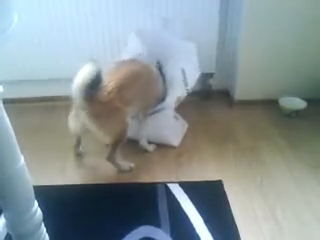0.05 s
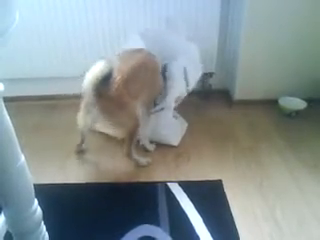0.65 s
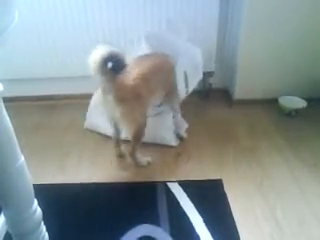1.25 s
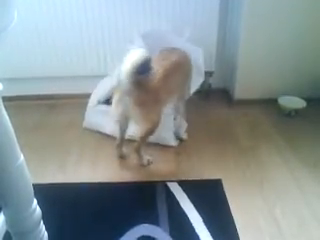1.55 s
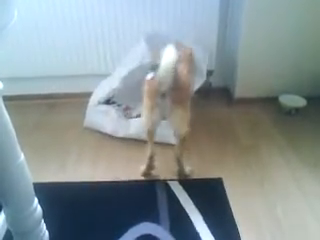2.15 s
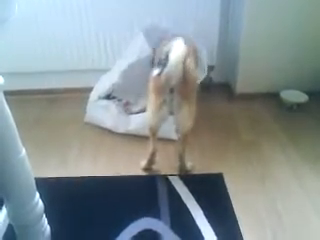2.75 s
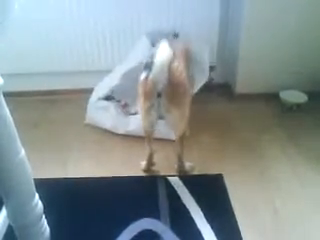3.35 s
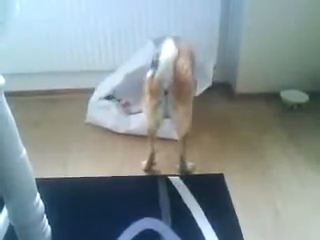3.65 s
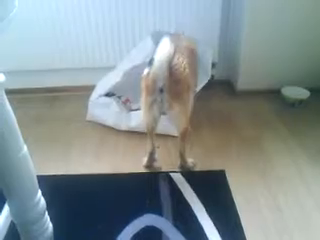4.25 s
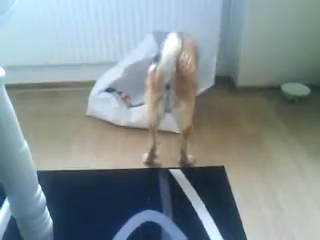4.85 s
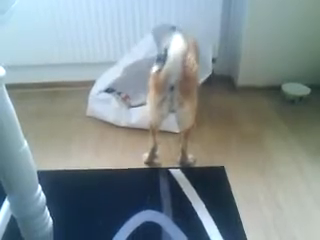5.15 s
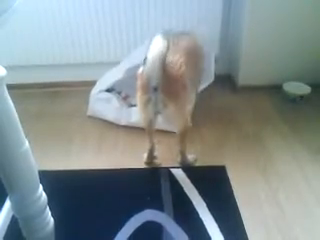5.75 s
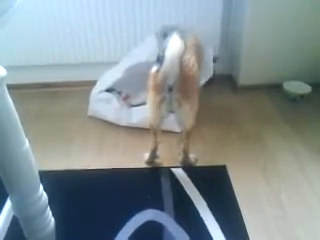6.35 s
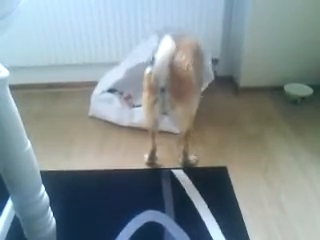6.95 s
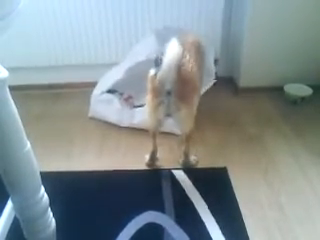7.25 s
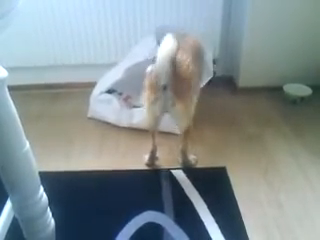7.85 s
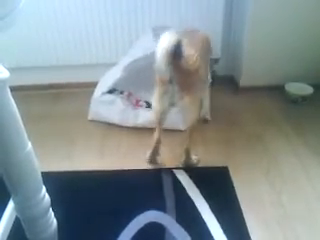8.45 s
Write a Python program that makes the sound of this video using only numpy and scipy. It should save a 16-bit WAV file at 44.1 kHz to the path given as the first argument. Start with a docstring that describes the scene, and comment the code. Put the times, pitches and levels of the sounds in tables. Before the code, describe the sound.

A dog roots around in a big paper bag, making loud, uneven crumpling and rustling with sharp crackles in a small room.

```python
"""A dog roots with its head in a big paper bag on a wooden floor.
Each shove crumples the paper in a swarm of tiny buckles. Creases snap, whole panels flop,
and muzzle and paws bump the hollow bag. A small bare room rings after every shove.
It is all heard over a faint steady hush, a few steps away, by a microphone that loses the top treble."""
import sys
import numpy as np
from scipy import signal
from scipy.fft import rfft, irfft, next_fast_len
from scipy.io import wavfile
from scipy.ndimage import uniform_filter1d

SR = 44100
rng = np.random.default_rng(int(sys.argv[2]) if len(sys.argv) > 2 else 0)


def int16_out(signal):
    """Quantize to a 16-bit WAV file."""
    q = np.round(np.clip(np.atleast_2d(signal).T, -1, 1) * 32767)
    wavfile.write(sys.argv[1], SR, q.astype(np.int16))


N = 379680


def amp(db):
    """Turn decibels into a number to multiply by."""
    return 10 ** (np.asarray(db) / 20)


def unit(x):
    """Scale a sound to an average (rms) level of 1."""
    return x / np.sqrt(np.mean(x ** 2) + 1e-20)


def along(points, hz):
    """Read a curve between its (Hz, value) points, with octaves evenly spaced."""
    freqs, values = np.transpose(points)
    return np.interp(np.log(hz + 1), np.log(freqs + 1), values)


def coloured(x, gain):
    """Turn each frequency up or down by gain(hz)."""
    size = 2 * next_fast_len(len(x) // 2 + 4096)
    hz = np.fft.rfftfreq(size, 1 / SR)
    cepstrum = irfft(np.log(np.maximum(gain(hz), 1e-6)))
    # make the filter ring only after a sound, never before it
    cepstrum[1:size // 2] *= 2
    cepstrum[size // 2 + 1:] = 0
    return irfft(rfft(x, size) * np.exp(rfft(cepstrum)), size)[:len(x)]


def below(hz, edge_hz, order):
    """A soft step from 1 under the edge to 0 above it; a higher order is steeper."""
    return 1 / (1 + (hz / edge_hz) ** order)


def fade(t, seconds):
    """Die away by 60 dB in the given time."""
    return np.exp(-np.log(1000) * t / seconds)


def add(track, start_s, sound):
    """Mix a sound into the track."""
    part = track[max(round(start_s * SR), 0):][:len(sound)]
    part += sound[:len(part)]


def shove_force(peak_s, swell_s, ease_s):
    """The dog's push swells like a bell curve up to 1, then lets go."""
    t = np.arange(N) / SR - peak_s
    near = (t > -4 * swell_s) & (t < 6 * ease_s)
    force, t = np.zeros(N), t[near]
    force[near] = np.exp(-np.where(t < 0, np.abs(t / swell_s) ** 1.68, np.abs(t / ease_s) ** 1.31))
    return force


def buckles(per_second=480, spread_db=4.5, ring_s=0.011, colour_db=3.5, ripples_per_octave=0.7, count=48):
    """Small patches of paper buckle at random moments, each clicking with a tone of its own."""
    t = np.arange(SR // 100) / SR
    octaves = np.log2(np.fft.rfftfreq(len(t), 1 / SR) + 100)
    tint = amp(colour_db * np.cos(2 * np.pi * (ripples_per_octave * octaves + rng.random((count, 1)))))
    clicks = irfft(rfft(rng.standard_normal((count, len(t)))) * tint, len(t)) * fade(t, ring_s)
    clicks /= np.linalg.norm(clicks, axis=1, keepdims=True)
    dice = np.random.default_rng(rng.integers(1 << 30))
    when, size, which = dice.random((int(per_second * N / SR), 3)).T
    strength = amp(spread_db * np.minimum(-np.log(1 - size), 3))  # many weak, a few strong
    sounds = strength[:, None] * clicks[(which * count).astype(int)]
    places = (when * N).astype(int)[:, None] + np.arange(len(t))
    return np.bincount(places.ravel(), sounds.ravel(), N)[:N]


# The tone of crumpling paper. Each row: frequency in Hz, level in dB.
PAPER_TONE = [(30, -25.5), (60, -18.5), (95, -13), (135, -4.5), (280, -6), (450, -3.5), (650, 1), (1000, 3),
              (1250, -3.5), (1700, 0), (3200, -8.5), (4200, -19.5), (7000, -25.5)]
# The dog's shoves. Each row: moment of the peak, swell time and easing time, all in seconds,
# then level in dB, extra panel flexing in dB, extra fine crinkle in dB.
SHOVES = [(0, 0.05, 0.038, -24.5, 2, 0.5), (0.218, 0.053, 0.14, -16.5, -0.0, -0.5),
          (0.573, 0.15, 0.087, -30.5, 1, 3.5), (0.807, 0.083, 0.19, -25.5, 1, -2),
          (1.024, 0.034, 0.13, -21.5, 2.5, -0.5), (1.33, 0.1, 0.03, -33, 0.5, 1.5),
          (1.387, 0.028, 0.027, -16.5, 3, 0.5), (1.475, 0.017, 0.05, -24, 0.5, 0.5),
          (1.68, 0.15, 0.18, -33.5, 6, 0), (1.901, 0.047, 0.047, -19.5, 2.5, 3.5),
          (2.344, 0.12, 0.03, -16.5, 1.5, -3), (2.503, 0.11, 0.071, -33, 2.5, -1),
          (3.121, 0.19, 0.045, -18.5, 1.5, 3.5), (3.323, 0.25, 0.039, -24, -3.5, 3.5),
          (3.714, 0.17, 0.165, -23, 1.5, -1), (3.91, 0.035, 0.021, -18.5, -4.5, 9),
          (4.284, 0.067, 0.13, -22.5, -1, 3), (4.53, 0.11, 0.033, -25.5, -0.5, 3.5),
          (4.95, 0.072, 0.12, -20.5, 0, 4.5), (5.132, 0.028, 0.071, -25, 2, 4.5),
          (5.28, 0.099, 0.036, -27.5, -1.5, 4), (5.404, 0.028, 0.073, -29.5, -4, 3.5),
          (5.571, 0.11, 0.078, -17.5, -0.5, 5), (5.751, 0.04, 0.061, -23.5, -3, 0),
          (6.163, 0.29, 0.09, -30, 3.5, 1.0), (6.368, 0.057, 0.024, -18.5, 1, 3),
          (6.845, 0.15, 0.16, -18.5, 0, 2.0), (7.017, 0.013, 0.14, -21.5, 1, -1.5),
          (7.535, 0.11, 0.067, -21, 0.0, -2), (7.778, 0.16, 0.08, -23.5, 0.5, 1.0),
          (8.215, 0.075, 0.037, -16.5, -0.5, 4.5), (8.312, 0.012, 0.088, -17, -0.5, 3.5)]
def crumpling(panel_top_hz=680, wrinkle_bottom_hz=3800):
    """One swarm of buckles shakes low panels, middle creases and high wrinkles as the dog shoves."""
    power, out = np.zeros((3, N)), np.zeros(N)
    for peak_s, swell_s, ease_s, db, flex_db, crinkle_db in SHOVES:
        force = shove_force(peak_s, swell_s, ease_s)
        power[0] += (amp(db - 10 + flex_db) * force ** 0.91) ** 2  # panels give early
        power[1] += (amp(db - 3) * force) ** 2  # creases follow the push
        power[2] += (amp(db - 11.5 + crinkle_db) * force ** 1.17) ** 2  # fine wrinkles need force

    def tone(hz, band):
        panels = below(hz, panel_top_hz, order=6)
        wrinkles = 1 - below(hz, wrinkle_bottom_hz, order=10)
        creases = np.clip(1 - panels - wrinkles, 0, 1)
        return amp(along(PAPER_TONE, hz)) * np.sqrt((panels, creases, wrinkles)[band])

    swarm = buckles()
    for band, level in enumerate(np.sqrt(power)):
        out += level * unit(coloured(swarm, lambda hz: tone(hz, band)))
    return out * dips_before_snaps()


# The tone of the still room. Each row: frequency in Hz, level in dB.
HUSH_TONE = [(25, -3.5), (60, -3), (130, -2), (300, -12), (1000, -17.5), (3000, -16.5), (7000, -28.5)]
def room_hush():
    """The still room makes a steady noise, strongest in the bass."""
    return unit(coloured(rng.standard_normal(N), lambda hz: amp(along(HUSH_TONE, hz))))


# The tone of a snapping crease. Each row: frequency in Hz, level in dB.
SNAP_TONE = [(60, -31), (200, -7), (500, -7), (1000, -1), (1600, -1), (2400, -0.5), (3200, 2), (4200, -7.5),
             (7000, -15)]
# Creases that snap. Each row: moment in seconds, strength in dB, extra treble in dB,
# level of the flurry compared with the crack in dB.
SNAPS = [(0.3436, -5.5, -11, -4.5), (0.439, -6, -5.5, -4.5), (0.5624, -6.5, -8, -6),
         (0.7505, 0.5, -5.5, -2.5), (0.7714, -8, 1, -8.5), (0.8927, 2, 1.5, -4), (1.0033, -10, -4.5, -3),
         (1.4606, -5.5, -0.5, -5.5), (1.711, -8.5, -1.5, -3.5), (1.7556, -4, -6.5, -4.5),
         (1.8541, -3, -2.5, -3.5), (1.9935, -7, -7, -5), (2.1672, -7, -7.5, -7.5), (2.196, 0.5, -7, -9.5),
         (2.2499, -9.5, -4, -2.5), (2.3494, 1, 2.5, -6.5), (2.4994, -6.5, -21, -9), (2.6601, 0.5, -10, -4),
         (2.767, -9.5, -13, -6), (3.23, -3.5, -4, -3.5), (3.313, 2, -10, -9.5), (3.5672, 2.5, -4.5, -11.5),
         (4.2498, 3, 0.5, -8.5), (4.2655, 0, 3, -10), (4.298, -10, -2, -12), (4.4307, -5.5, -17, -7),
         (4.5147, -7.5, 1, -3), (4.8198, -13.5, -4.5, -4), (5.0315, -4, -1.5, -5), (5.1335, -8, 0, -3.5),
         (5.475, -6.5, -11.5, -1.5), (5.4913, 1, 7, -8), (5.743, -9, -2, -1.5), (5.9652, -2, -9, -7),
         (5.9928, -6, 3, -10.5), (6.124, -8, -9.5, -3.5), (6.2765, -10.5, -4, 0), (6.3537, -4.5, -3.5, -2),
         (6.6162, -1.5, -20, -3.5), (6.7048, -2.5, -1, -2.5), (6.764, -3.5, -0.5, -6.5),
         (7.111, -7.5, -1.5, -2.5), (7.306, -2, -3, -9.5), (7.5152, 1, 0.5, -10), (8.108, 4, -5.5, -13),
         (8.1506, -1, -2.5, -2.5), (8.316, -2.5, 1, -4.5), (8.3694, -5, -4, 0)]
def crease_snaps(crack_s=0.011, flurry_s=0.068, run_s=0.00074, lead_s=0.003, grit_db=3.5):
    """A faint, very brief noise swells into one crack, followed by a flurry of crinkles."""
    t, out = np.arange(-SR // 50, SR // 6) / SR, np.zeros(N)
    after = np.maximum(t, 0)
    giving = 1 - np.exp(-after / run_s)  # the fold takes a moment to run along the sheet
    lead_in = amp(-15) * np.exp(-np.abs(t) / lead_s)
    for moment_s, db, treble_db, flurry_db in SNAPS:
        noise = rng.standard_normal(len(t))
        flicker = np.repeat(rng.uniform(-2, 2, len(t)), 48)[:len(t)]  # a new level every 48 samples
        grit = unit(noise * amp(grit_db * flicker))
        crack = rng.standard_normal(len(t)) * fade(after, crack_s)
        flurry = amp(flurry_db) * grit * fade(after, flurry_s)
        burst = giving * (crack + flurry) + lead_in * grit
        treble = [(1700, 0), (5000, treble_db)]  # a tight crease keeps more treble
        snap = coloured(burst, lambda hz: amp(along(SNAP_TONE, hz) + along(treble, hz)))
        add(out, moment_s + t[0], amp(db) * snap)
    return out


def dips_before_snaps(depth=0.17, lead_s=0.02):
    """Just before a crease gives way, the paper takes up the load and gets a little quieter."""
    t, gain = np.arange(N) / SR, np.ones(N)
    for moment_s, *_ in SNAPS:
        near = slice(max(round((moment_s - 4 * lead_s) * SR), 0), round(moment_s * SR))
        gain[near] *= 1 - depth * np.exp(-((moment_s - t[near]) / lead_s) ** 2)
    return gain


# Panels that flop or are pushed on the floor. Each row: start in seconds, level in dB, pitch in Hz.
FLOPS = [(0.354, -21, 246), (0.848, -25, 170), (1.081, -29.5, 176), (1.377, -26, 147), (1.869, -24, 137.5),
         (2.339, -15.5, 321), (3.061, -17, 121), (4.933, -22.5, 206), (5.29, -23, 283), (6.368, -20.5, 261),
         (7.79, -26, 265), (8.079, -27, 147), (8.136, -26, 300), (8.307, -29, 155)]
def panel_flops(ring_s=0.082, attack_s=0.0057):
    """A broad panel pushes air: a short, soft, low thud."""
    t, out = np.arange(SR // 4) / SR, np.zeros(N)
    shape = fade(t, ring_s) * (1 - np.exp(-t / attack_s))
    for start_s, db, hz in FLOPS:
        add(out, start_s, amp(db) * np.sin(2 * np.pi * hz * t) * shape)
    return out


# Muzzle and paws bump the hollow bag. Each row: start in seconds, level in dB, pitch in Hz.
BUMPS = [(1.007, -24, 495.0), (1.341, -24.5, 457.0), (1.616, -25.5, 870.0), (2.659, -27, 940.0),
         (3.589, -28, 635), (4.431, -24.5, 560), (5.286, -23.5, 970.0), (5.741, -21, 510.0),
         (5.965, -18, 1220.0), (6.276, -23, 520.0), (6.615, -21.5, 1000.0), (7.279, -30, 520.0),
         (8.078, -32.5, 530.0)]
def dog_bumps(ring_s=0.068, sharpness=2.5):
    """A soft touch sets a taut panel drumming briefly around one rough pitch."""
    t, out = np.arange(SR // 6) / SR, np.zeros(N)
    for start_s, db, pitch in BUMPS:
        panel = lambda hz: 1 / (1 + (sharpness * (hz / pitch - pitch / (hz + 1)) / 2) ** 2)
        drumming = unit(coloured(rng.standard_normal(len(t)), panel))
        add(out, start_s, amp(db) * drumming * fade(t, ring_s))
    return out


# How long the room rings. Each row: frequency in Hz, seconds to die away by 60 dB.
RING_TIMES = [(100, 0.52), (700, 0.41), (2000, 0.41), (6000, 0.38)]
def room_echo(x, echo_db=3, build_s=0.00095, spots=12, hold_samples=256):
    """From moment to moment another spot of the bag sounds, and the walls answer each differently."""
    sounding = np.repeat(rng.integers(spots, size=N // hold_samples + 1), hold_samples)[:N]
    echo = np.zeros(N)
    for spot in range(spots):
        hz, t, noise = signal.stft(rng.standard_normal(SR // 2), SR, nperseg=256)
        decay = 1e-3 ** (t / along(RING_TIMES, hz)[:, None])
        _, tail = signal.istft(noise * decay, SR, nperseg=256)
        tail *= 1 - np.exp(-np.arange(len(tail)) / SR / build_s)
        share = np.sin(np.pi / 2 * uniform_filter1d(1. * (sounding == spot), hold_samples))  # crossfade
        echo += signal.oaconvolve(x * share, tail / np.linalg.norm(tail))[:N]
    return (x + amp(echo_db) * echo) / np.hypot(1, amp(echo_db))


# Pitches at which the room and bag ring. Each row: frequency in Hz, width in Hz, boost in dB.
STANDING_WAVES = [(75, 14, 0.5), (127, 9.2, 7.5), (153.7, 15, 7.5), (206.6, 23, 5.5), (287, 81, 5),
                  (446.6, 22, 5.5), (520, 54, 5.5), (603, 16, 4.5), (740, 14, 2), (1019, 32, 5)]
def standing_waves(hz):
    """Sound bouncing inside the room and the bag builds up at a few pitches and boosts them."""
    return amp(sum(db / (1 + (2 * (hz - centre) / width) ** 2) for centre, width, db in STANDING_WAVES))


def scene():
    """The bag in the room, over a faint hush; paper gives off little deep bass."""
    bag = room_echo(crumpling() + crease_snaps() + dog_bumps() + panel_flops())
    bag = coloured(bag, lambda hz: standing_waves(hz) * np.sqrt(1 - below(hz, edge_hz=55, order=4)))
    return (amp(2.5) * bag + amp(-52) * room_hush())[None]


def record(dry):
    """The camera's microphone cuts off the top treble steeply."""
    size = next_fast_len(N + SR // 4)
    hz = np.fft.rfftfreq(size, 1 / SR)
    return irfft(rfft(dry, size) * below(hz, edge_hz=7040, order=120), size)[:, :N]


dry = scene()
out = record(dry)
int16_out(out)
```